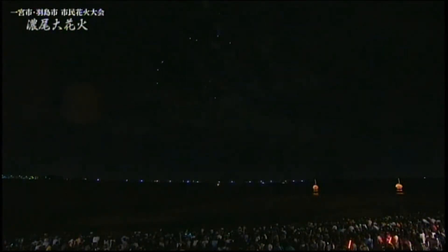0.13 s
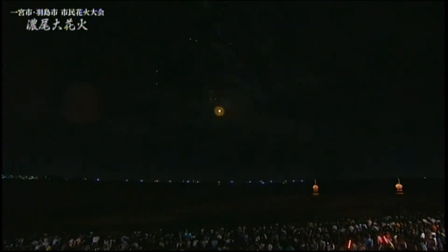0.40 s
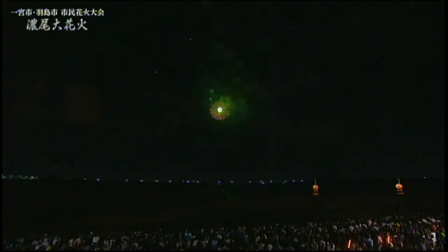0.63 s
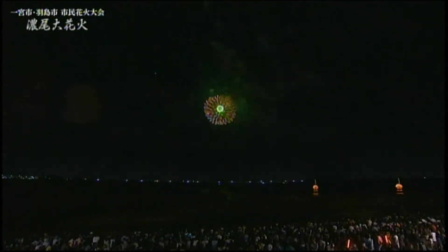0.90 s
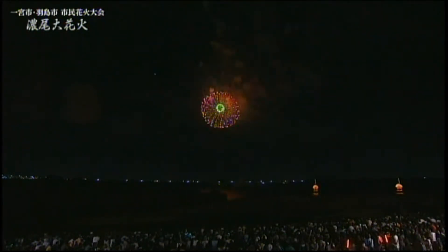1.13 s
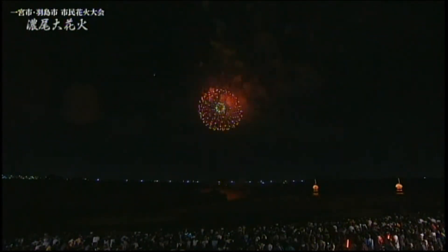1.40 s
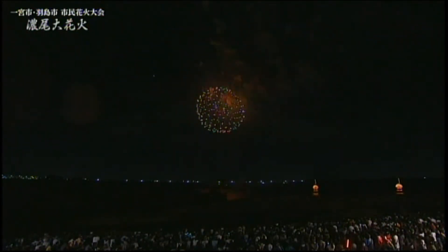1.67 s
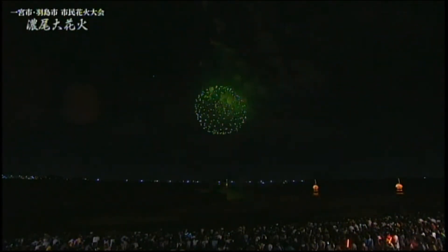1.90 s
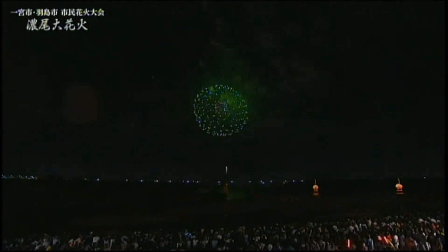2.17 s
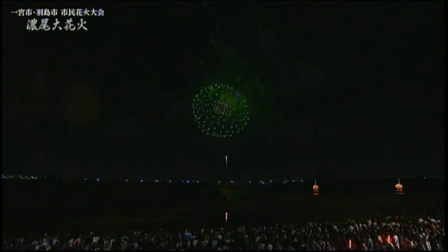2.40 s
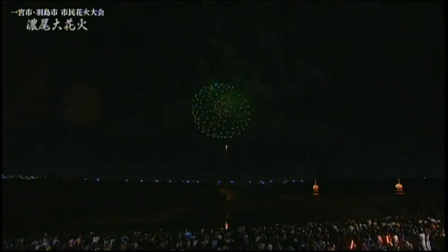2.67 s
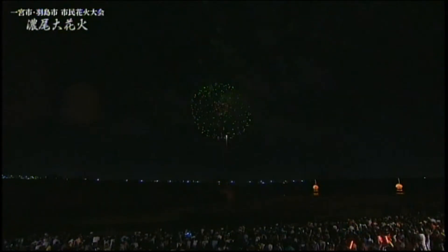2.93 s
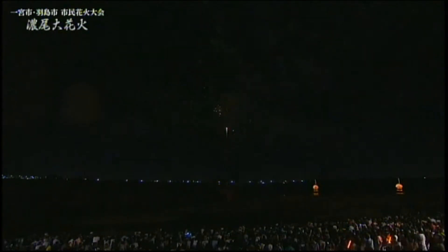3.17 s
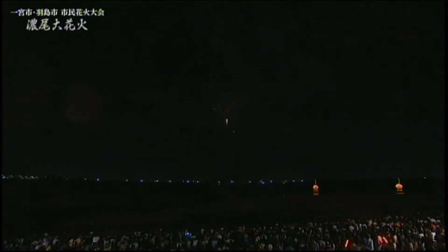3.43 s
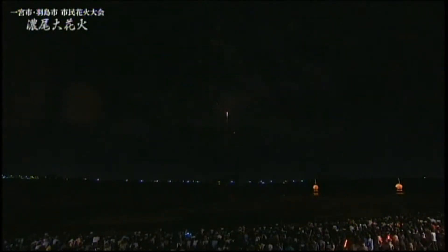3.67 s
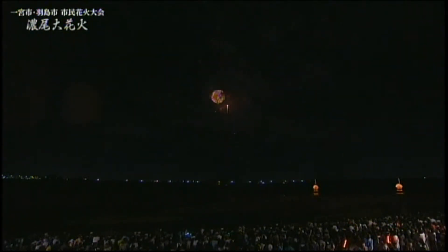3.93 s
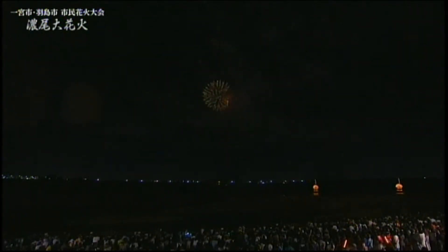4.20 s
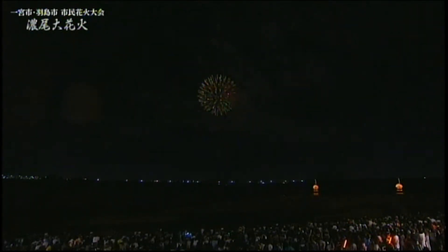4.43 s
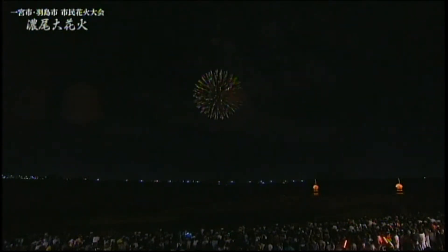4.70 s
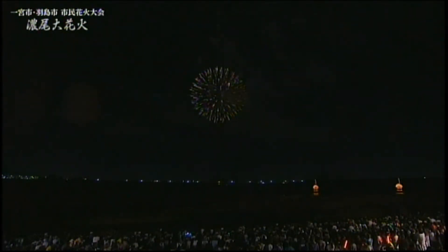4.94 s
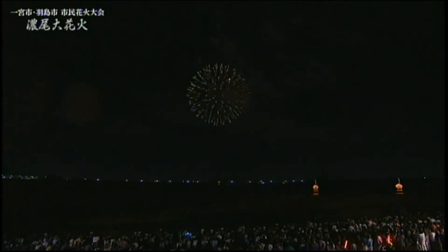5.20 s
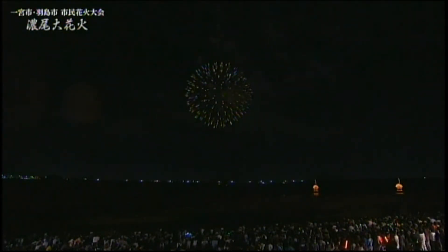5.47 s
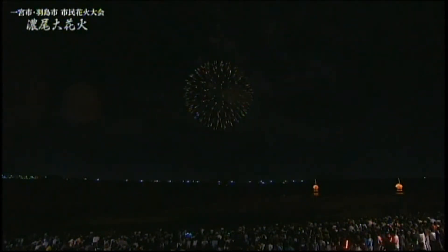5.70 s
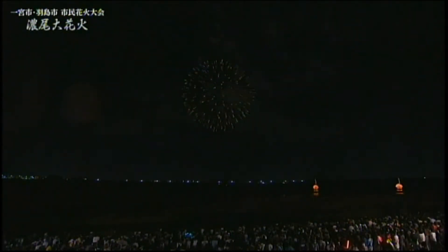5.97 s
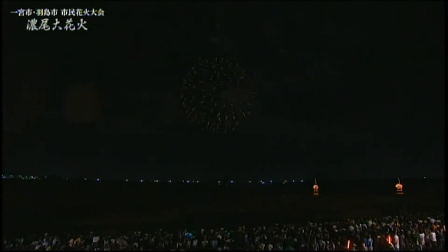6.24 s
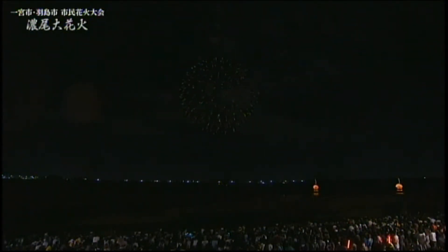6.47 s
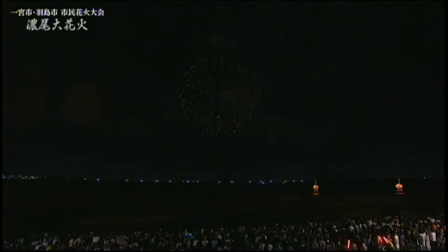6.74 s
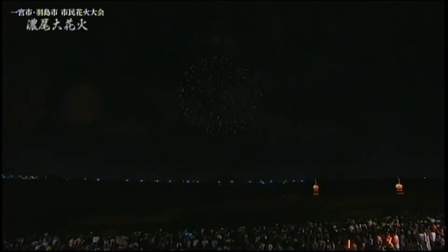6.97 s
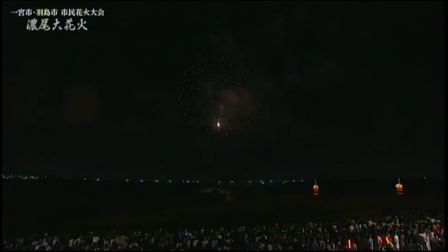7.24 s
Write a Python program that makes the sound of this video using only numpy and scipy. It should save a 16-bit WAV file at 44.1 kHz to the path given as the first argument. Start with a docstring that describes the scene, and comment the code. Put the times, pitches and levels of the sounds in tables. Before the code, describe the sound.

Outdoor night fireworks heard from across water. Light wind and a dull far hum, with faint low booms early on. A sharp, ragged bang at about two seconds slaps back off a wall; a deep hollow mortar thud follows, then a quiet far crack. Near six seconds comes the loudest, crisp and bassy bang, with echoes rolling away. Stereo microphones, faint electronic whine and hiss.

```python
"""Light wind, a distant hum and a faint electronic whine open a night by a river, with low booms from afar.
Then come fireworks far across the water: mortar launches are ragged volleys of small ringing fronts, shell bursts
are a few shock fronts, and thumps sink in pitch. A wall answers with inverted slaps, near ground and far banks
with decaying echoes; low booms, blast tails and far echoes roll as filtered noise.
The right microphone is thin in the bass and hears a little late."""
import sys
import numpy as np
from scipy import signal
from scipy.fft import rfft, irfft, next_fast_len
from scipy.io import wavfile
from scipy.ndimage import uniform_filter1d, map_coordinates

SR = 44100
rng = np.random.default_rng(int(sys.argv[2]) if len(sys.argv) > 2 else 0)


def store_wav(level_fs):
    """Save 16-bit WAV to argv[1]."""
    pcm = np.round(np.clip(np.atleast_2d(level_fs), -1, 1) * 32767)
    wavfile.write(sys.argv[1], SR, pcm.T.astype(np.int16))


def boost(x):
    """Linear amplitude factor 10**(x/20) for a level x in decibels (scalar or array-like)."""
    u = np.asarray(x, float) / 20
    return 10 ** u


N = 324748
SIZE = 4096  # samples in a front, volley or thump


def fronts():
    """Shock waves: the sharp pressure arrivals of two bursts and one far echo."""
    # Each row: start in seconds, peak in dB, push in ms, blur in ms, left over right in dB.
    arrivals = [(2.1121, -20.5, 0.42, 0.072, 0), (2.1144, -14, 0.48, 0.057, -8),
                (2.1156, -10, 0.32, .05, 3), (2.1175, -16.5, 0.36, .09, -9), (2.1185, -12.5, 0.4, 0.16, -6),
                (2.1205, -17, 0.57, 0.11, -1), (2.125, -15, 0.35, 0.12, 7.5), (2.6215, -29.5, 1.1, .25, 0),
                (5.721, -19.5, 0.75, 0.041, 1.5), (5.7238, -3.5, 0.42, 0.26, -3.5),
                (5.7296, -10.5, 0.41, 0.026, 14.5), (5.7294, -8.5, 0.34, 0.072, -5),
                (5.7385, -14, 2, 0.33, 14), (5.7409, -23, 0.46, 0.11, -6)]
    out = np.zeros((2, N))
    for s, db, push_ms, blur_ms, pan_db in arrivals:
        add(out, s - SIZE / 2 / SR, boost(db) * front(push_ms, blur_ms), pan_db)
    return out


def front(push_ms, blur_ms):
    """Blast pulse: a push then a suction, (1 - u) exp(-u), rounded by turbulent air; peak 1 in the middle."""
    hz = np.fft.rfftfreq(SIZE, 1 / SR)
    w = 2j * np.pi * hz / 1000  # radians per ms
    pulse = w / (1 + w * push_ms) ** 2
    blur = np.exp((w * blur_ms) ** 2 / 2)
    shape = np.roll(irfft(air(hz) * pulse * blur), SIZE // 2)
    return shape / shape.max()


def air(hz):
    """Atmospheric absorption: the long path dulls the treble."""
    return 1 / (1 + 1j * hz / 13500) ** 6


def launches():
    """Resonance of mortar shots: a volley rings in a middle band, then a later one in a lower band."""
    # Each row: start in seconds, length in ms, rms level in dB, ring in Hz, low ring in Hz, sharpness Q.
    shots = [(1.988, 23.8, -33, 801, 515, 4.5), (3.565, 28.9, -21, 751, 368.4, 1.5)]
    low_late = 0.25  # the low ring sets in after this share of the length
    out = np.zeros((2, N))
    for s, ms, db, hz, low_hz, q in shots:
        middle = volley(ms, hz, q, high_db=-4, lean=1.46)
        low = volley((1 - low_late) * ms, low_hz, q, high_db=-11, lean=1.7)
        add(out, s, boost(db) * middle, pan_db=5.5)
        add(out, s + low_late * ms / 1000, boost(db - 1) * low, pan_db=-0.5)
    return out


def burst_volleys():
    """Superposition of many small pulses: broad ragged volleys around the fronts of a burst."""
    # Each row: start in seconds, length in ms, rms level in dB, ring in Hz, left over right in dB.
    broad = [(2.109, 14.2, -38, 1440, 11), (2.123, 7.5, -34.5, 1090, 11), (2.613, 6.2, -54, 500, 12),
             (5.722, 4.5, -30.5, 1500, 2.5), (5.73, 4, -35, 1600, 13), (5.737, 11.9, -37, 1320, 20.5)]
    out = np.zeros((2, N))
    for s, ms, db, hz, pan_db in broad:
        add(out, s, boost(db) * volley(ms, hz, q=0.8, high_db=-1, lean=1.0), pan_db)
    return out


def far_cracks():
    """Band limitation with distance: lone hollow cracks, farther off, keep only a middle band."""
    # Each row: start in seconds, length in ms, rms level in dB before the band filter, ring in Hz.
    lone = [(3.94, 20, -42, 695), (6.124, 22, -42.5, 710)]
    out = np.zeros((2, N))

    def band(hz):
        return (1j * hz / (397 + 1j * hz)) ** 3 / (1 + 1j * hz / 8000) ** 2

    for s, ms, db, ring_hz in lone:
        crack = volley(ms, ring_hz, q=1.27, high_db=-6.5, lean=0.98)
        add(out, s, boost(db) * filtered(crack, band), pan_db=8)
    return out


def volley(ms, low_hz, q, high_db, lean):
    """Impulse-driven resonance: dense uneven kicks ring two bands in one swell; rms 1 over its length."""
    gap, size = rng.standard_normal((2, 400))
    u = np.cumsum(np.exp(.4 * gap)) * .3 / ms  # kick times as shares of the length
    swell = np.sin(np.pi * np.clip(u, 0, 1) ** lean) ** .9 * (u < 1)  # peaks later as lean grows
    places = np.minimum(u * ms * SR / 1000, SIZE - 1).astype(int)
    kicks = np.bincount(places, swell * size, SIZE)

    def ring(f, hz):
        return 1j * f * hz / q / (hz * hz - f * f + 1j * f * hz / q)

    def response(f):
        return air(2.02 * f) * (ring(f, low_hz) - boost(high_db) * ring(f, 3.11 * low_hz))

    return unit(filtered(kicks, response)) * np.sqrt(ms * SR / 1000 / SIZE)


def thumps():
    """Dispersing low oscillation: each half swing tends to about 2.6 times the one before, so pitch sinks."""
    # Each row: start in seconds, peak in dB, time scale in ms.
    blows = [(2.006, -26, 1.8), (2.1166, -17, 1.64), (2.618, -34, 1.6), (3.585, -15, 1.96),
             (5.7277, -10.5, 1.93), (6.312, -44, 2.1)]
    out, ms = np.zeros((2, N)), np.arange(SIZE) / SR * 1000
    for s, db, scale in blows:
        swing = np.sin(3.3 * np.log(1 + ms / scale))
        swing = swing * (1 - np.exp(-ms / 3.5))  # soft onset
        swing = swing * np.exp(-ms / scale / 8)
        add(out, s, boost(db) * swing / abs(swing).max(), 0)
    return out


def slaps():
    """Reflection with inversion: a wall returns an upturned front, two blunter repeats and a hollow ring."""
    # Each row: start in seconds, peak in dB, repeats' level against it in dB, left over right in dB.
    returns = [(2.2113, -31, -11.5, 1.5), (3.6944, -32, -24, 1), (5.817, -22, -9, 4), (6.3119, -32, -3, -2)]
    # Steps of the wall. Each row: delay in ms, further level change in dB.
    steps = [(8.1, -0.5), (14.9, -2)]
    out = np.zeros((2, N))
    for s, db, repeat_db, pan_db in returns:
        add(out, s - SIZE / 2 / SR, -boost(db) * front(push_ms=.45, blur_ms=.08), pan_db)
        for ms, step_db in steps:
            repeat = front(push_ms=0.26, blur_ms=0.29)
            add(out, s + ms / 1000 - SIZE / 2 / SR, -boost(db + repeat_db + step_db) * repeat, pan_db)
        hollow = volley(28.6, 613, q=5.5, high_db=-48, lean=0.55)
        add(out, s, boost(db - 21.5) * hollow, pan_db + 5.5)
    return out


def near_scatter(cracks):
    """Short reverberation: near ground and crowd scatter the cracks."""
    # Each row: frequency in Hz, decay time t60 in seconds.
    near_decay = [(150, .07), (700, .09), (2000, .11), (5000, .1), (9000, .07)]
    return boost(-20) * echoes(cracks, near_decay, late_ms=5)


def far_banks(cracks):
    """Delayed reverberation: the far banks return a longer, weaker tail."""
    # Each row: frequency in Hz, decay time t60 in seconds.
    far_decay = [(150, 0.33), (700, 0.43), (3000, 0.25), (8000, 0.204)]
    return boost(-39) * echoes(cracks, far_decay, late_ms=60)


def echoes(x, decay, late_ms):
    """Frequency-dependent decay: each band dies at its own speed; each second of sound draws a new random tail."""
    out = np.zeros((2, N + 3 * SR))
    for start in range(0, N, SR):
        hz, t, z = signal.stft(rng.standard_normal((2, SR)), SR, nperseg=128)
        fade = boost(-60 * t / along(decay, hz)[:, None])
        tail = signal.istft(z * fade, SR, nperseg=128)[1]
        wet = signal.fftconvolve(x[:, start:start + SR], tail / np.linalg.norm(tail[0]), axes=1)
        out[:, start + round(late_ms * SR / 1000):][:, :wet.shape[1]] += wet
    return out[:, :N]


def rolls():
    """Exponential decay of noise: distant low booms, blast tails and far echoes, partly shared by both sides."""
    # Each row: start in seconds, rms level in dB before onset and decay, t60 in seconds, bottom in Hz, top in Hz.
    booms_and_tails = [(.12, -47.5, 0.36, 36, 704), (.33, -52, .64, 120, 1540), (.829, -54.5, .46, 50, 500),
                       (2.127, -38, 0.11, 1300, 3970), (2.618, -45.5, 0.62, 250, 3640),
                       (2.679, -49.5, 0.28, 300, 3350), (2.93, -54.5, 0.13, 570, 2600),
                       (3.05, -54.5, 1, 440, 2300), (3.596, -33.5, .08, 500, 2407),
                       (3.755, -54.5, 0.16, 630, 1600), (3.835, -58, 0.15, 680, 2000),
                       (4.049, -56, 0.45, 900, 2220), (4.46, -50, 0.48, 54, 407),
                       (4.665, -54.5, 0.51, 560, 2250), (5.741, -36, 0.24, 860, 4000),
                       (5.751, -35, 0.39, 15, 60), (5.932, -51, .069, 510, 1200),
                       (6.241, -52.5, 0.1, 640, 1200), (6.314, -50.5, 0.6, 400, 3570),
                       (6.77, -47.5, 0.58, 280, 2560), (7.08, -48, 0.21, 50, 707)]
    out, t = np.zeros((2, N + SR)), np.arange(SR // 2) / SR  # each roll stops after half a second
    for s, db, t60, low_hz, top_hz in booms_and_tails:
        roughness = boost(3 * rng.standard_normal((3, len(t))))
        shared, *own = rng.standard_normal((3, len(t))) * roughness

        def tilt(f):
            bottom = (1j * f / (low_hz + 1j * f)) ** 2
            return bottom / (low_hz + 1j * f) / np.sqrt(1 + (f / top_hz) ** 6)

        noise = unit(filtered(0.45 * shared + np.array(own), tilt))
        onset = 1 - np.exp(-t / t60 / 0.033)
        add(out, s, noise * boost(db - 60 * t / t60) * onset, 0)
    return out[:, :N]


def wind():
    """Turbulent pressure at the microphones: deep buffet and faster flutter, almost unrelated between sides."""
    # Each row: time in seconds, buffet level in dB before its random swings.
    gusts = [(0.0, -57), (0.45, -53), (0.75, -58), (1.45, -55), (2.15, -52), (2.7, -55.5), (3.2, -55.5),
             (3.55, -49), (4.2, -54), (4.5, -50.5), (4.9, -57), (5.6, -55), (6.3, -54.5), (6.75, -56.5),
             (7.36, -51.5)]
    # Both spectra, each row: frequency in Hz, relative level per hertz in dB.
    buffet_spectrum = [(10, -34), (22, 10.5), (40, 3.5), (70, -9.5), (110, -45)]
    flutter_spectrum = [(40, -31.5), (70, 8), (130, 0), (200, -9), (350, -34.5)]
    buffet_db = curve(gusts) + 1.5 * wobble(5.3)
    flutter_db = -62 + 0.71 * wobble(5) + 3.2 * wobble(53)
    buffet = boost(buffet_db) * rush(buffet_spectrum, alike=0.043, patchy_db=2.5)
    return buffet + boost(flutter_db) * rush(flutter_spectrum, alike=0.031, patchy_db=-2.0)


def hum_and_wash():
    """Diffuse field: hum and far wash come from all around, the hum following part of the wash's swing."""
    # The wash swells after blasts. Each row: time in seconds, level in dB before its random swings.
    swells = [(0.0, -68.5), (0.6, -72.5), (1.1, -73), (1.55, -75.5), (1.97, -80), (2.15, -66), (2.6, -72.5),
              (3.14, -66.5), (3.65, -65.5), (4.08, -69), (4.6, -70.5), (5.0, -74), (5.7, -79), (5.82, -60),
              (6.19, -68), (6.5, -64.5), (6.95, -64), (7.36, -72.5)]
    # Both spectra, each row: frequency in Hz, relative level per hertz in dB.
    hum_spectrum = [(120, -23.5), (220, -1.5), (400, -2), (620, 0), (850, -4.5), (1150, -16), (1800, -37.5)]
    wash_spectrum = [(500, -38), (900, -0.5), (1400, 1.5), (2200, -6), (3500, -12.5), (5000, -23.5),
                     (7000, -42.5)]
    wash_db = curve(swells)
    hum_db = -65 + 0.29 * (wash_db - wash_db.mean()) + 3.0 * wobble(12)
    hum = boost(hum_db) * rush(hum_spectrum, alike=0.44, patchy_db=0.5)
    return hum + boost(wash_db + 0.4 * wobble(11)) * rush(wash_spectrum, alike=0.067, patchy_db=-0.5)


def whine():
    """Interference of nearly steady tones in the electronics: the close pair at the top beats slowly."""
    # Each row: frequency in Hz, rms level in dB before a slight wobble, left over right in dB.
    tones = [(1501, -85, 3), (2999, -82, 5), (4500, -86, 1.5), (6001, -84, 7), (7499, -97, 0),
             (9001, -89, -3), (11999, -102, 0), (14998, -100, 0), (15734.26, -85, 0), (15734.55, -89, 0)]
    t = np.arange(N) / SR - 1.4  # all crests meet at 1.4 s
    sides = np.array([[.5], [-.5]])
    out = np.zeros((2, N))
    for hz, db, pan_db in tones:
        gain = boost(db + sides * pan_db + 0.27 * wobble(3))
        out += np.sqrt(2) * gain * np.cos(2 * np.pi * hz * t)
    return out


def hiss():
    """Broadband noise of the electronics, a little stronger on the left."""
    # Each row: frequency in Hz, relative level per hertz in dB.
    hiss_spectrum = [(300, -2.5), (2500, 1.5), (6000, -0.5), (10000, -5.5), (15500, -12), (16000, -20.5)]
    return boost([[-76 + .8], [-76 - .8]]) * rush(hiss_spectrum, alike=.12, patchy_db=-0.5)


def rush(spectrum, alike, patchy_db):
    """Partial coherence: shaped stereo noise of rms 1, gain patchy in time and pitch, sides correlated by alike."""
    z = signal.stft(rng.standard_normal((2, N)), nperseg=512)[2]
    field = uniform_filter1d(rng.standard_normal(z.shape[1:]), size=6, axis=0)
    field = uniform_filter1d(field, size=12, axis=1)
    a, b = signal.istft(z * boost(patchy_db * unit(field)), nperseg=512)[1][:, :N]
    turn = np.arccos(np.clip(alike, -1, 1)) / 2
    pair = np.cos(turn) * a + np.sin(turn) * np.array([b, -b])
    return unit(filtered(pair, lambda hz: boost(along(spectrum, hz))))


def along(points, hz):
    """Logarithmic pitch scale: (Hz, value) points joined on a log axis."""
    f, v = np.transpose(points)
    return np.interp(np.log(hz + 1), np.log(f + 1), v)


def curve(points):
    """Linear interpolation: (seconds, value) points to one value per sample."""
    s, v = np.transpose(points)
    return np.interp(np.arange(N) / SR, s, v)


def unit(x):
    """Power normalisation: scaled to rms 1."""
    return x / np.sqrt(np.mean(x ** 2) + 1e-20)


def wobble(rate):
    """Band-limited fluctuation: a smooth random curve, rate knots a second."""
    knots = rng.standard_normal(int(N * rate / SR) + 4)
    return map_coordinates(knots, [np.arange(N) * rate / SR])


def filtered(x, response):
    """Linear filtering: the spectrum of x times a complex response of frequency."""
    m = next_fast_len(x.shape[-1] + SIZE)
    return irfft(rfft(x, m) * response(np.fft.rfftfreq(m, 1 / SR)), m)[..., :x.shape[-1]]


def add(pair, s, sound, pan_db):
    """Superposition: mixes a short sound into both sides at s seconds, left over right by pan_db."""
    pair[:, round(s * SR):][:, :sound.shape[-1]] += sound * boost([[pan_db / 2], [-pan_db / 2]])


def scene():
    """Superposition of blasts, their echoes, rolling booms and the night."""
    cracks = fronts() + slaps() + launches() + burst_volleys() + far_cracks()
    reverberation = near_scatter(cracks) + far_banks(cracks)
    return cracks + thumps() + reverberation + rolls() + wind() + hum_and_wash()


def band_limit(x):
    """A steep low-pass at the top of the band."""
    return signal.sosfilt(signal.butter(12, 15752, fs=SR, output="sos"), x)


def record(dry):
    """Microphone response: the right side cuts the bass and lags 0.15 ms; hiss and steady tones join."""
    def thin(hz):
        bass_cut = (50 ** 2 - hz * hz + 1j * hz * 60) / (120 ** 2 - hz * hz + 1j * hz * 130)
        return bass_cut * np.exp(-2j * np.pi * hz * .00015)

    pair = np.array([dry[0], filtered(dry[1], thin)])
    return band_limit(pair + hiss() + whine())


dry = scene()
out = record(dry)
store_wav(out)
```